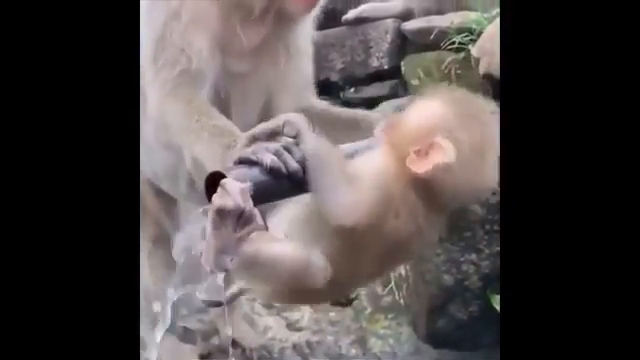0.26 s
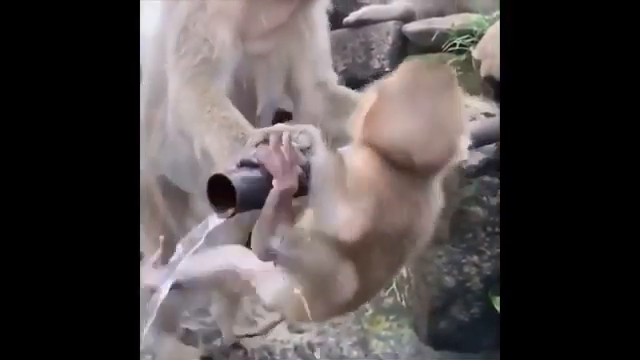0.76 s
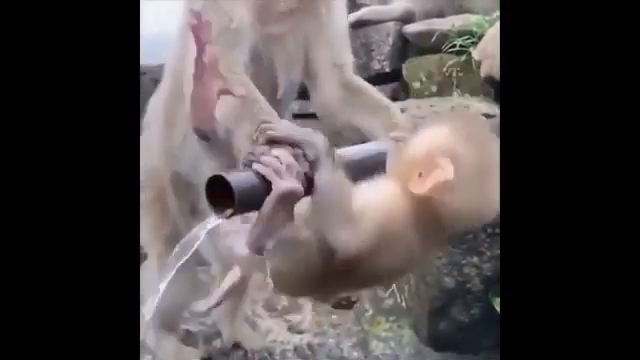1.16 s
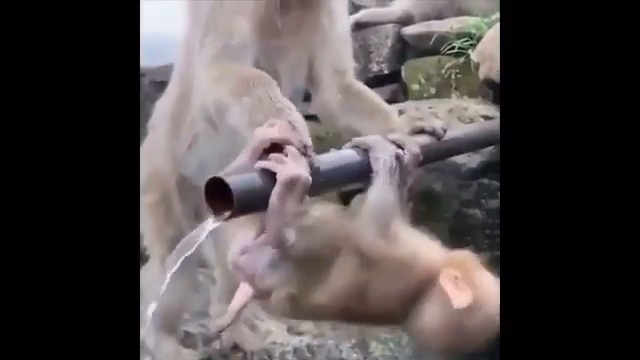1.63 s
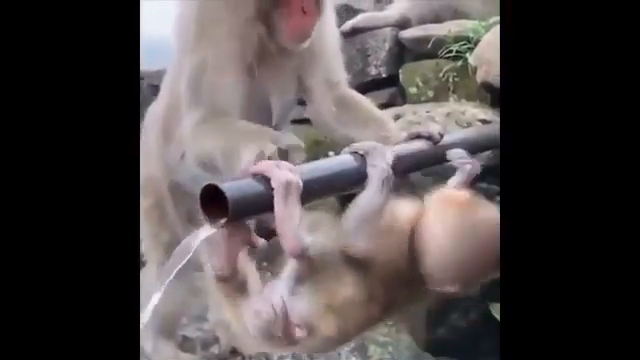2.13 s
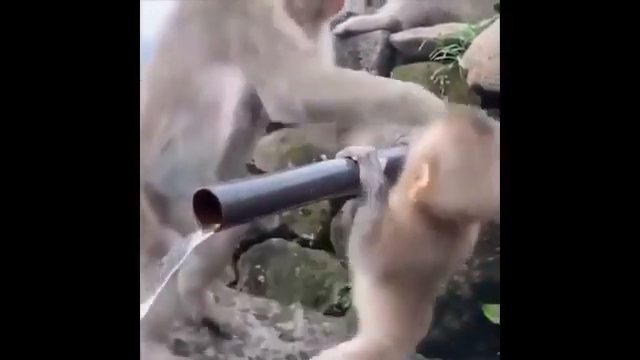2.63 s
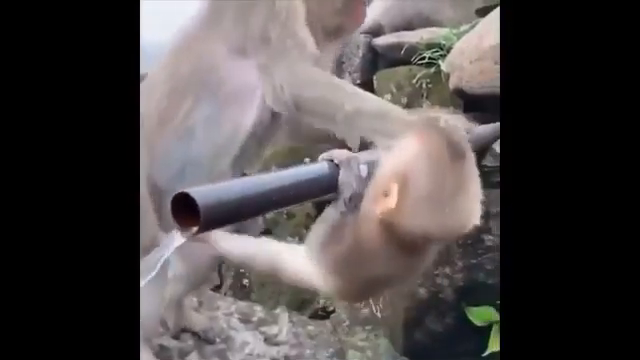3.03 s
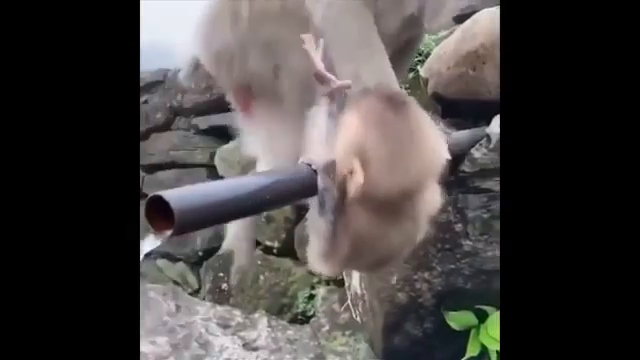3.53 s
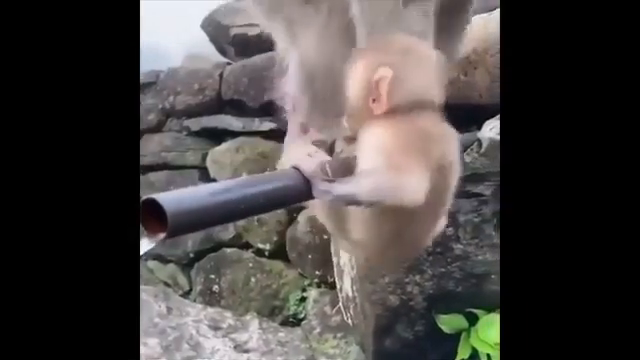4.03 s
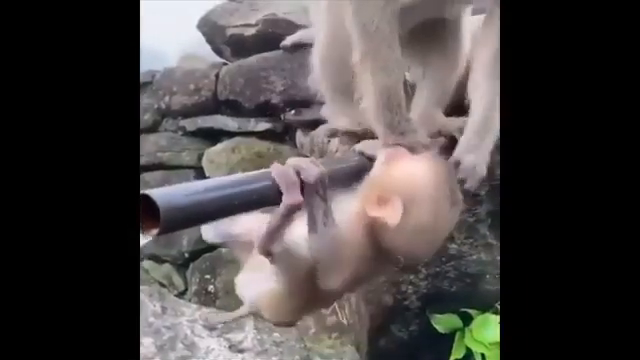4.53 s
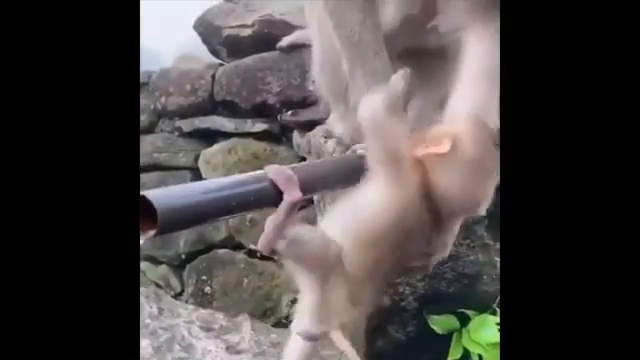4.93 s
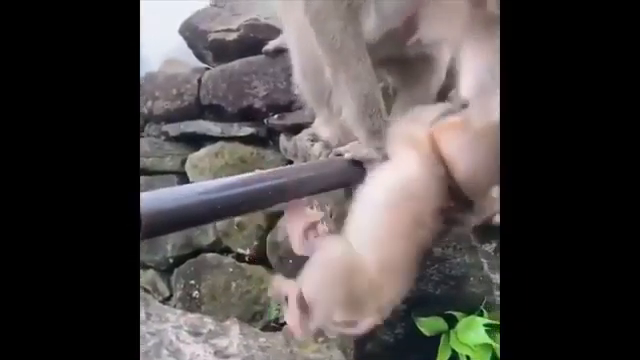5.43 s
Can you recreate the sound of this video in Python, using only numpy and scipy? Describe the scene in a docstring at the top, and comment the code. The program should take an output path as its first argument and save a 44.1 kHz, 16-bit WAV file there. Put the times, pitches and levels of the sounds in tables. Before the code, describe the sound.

A thin stream of water falls from a pipe and spatters on stone, heard closely outdoors through a small, slightly rough microphone. From 0 to 1.3 s the flow is disturbed: short rising bubble tones, hollow plops and wet slaps stir a churning, frothy puddle. Slaps gather from about 0.15 to 0.45 s, and the boldest gurgles come around 0.6 to 0.7 s, with more blips until about 1 s. Crisp drop bursts begin at about 0.1 s and continue throughout. After 1.3 s the gurgling is gone, leaving bright, dry-edged ticks and small splats at irregular spacing amid thin, clumped hissing spray that gently swells and thins. A short, soft low wind thump passes near 2.6 s. A fuller wet slap stands out at about 4.8 s. The patter runs on to the end at about 5.7 s, over a faint outdoor wash and light wind.

```python
"""A thin stream falls from a pipe and spatters on stone, outdoors, near a small microphone.
At first it is disturbed: trapped pockets gurgle as rising sines, slaps ring and puff in a churning puddle.
From the first moments drops burst on stone as filtered cracks and noise puffs, amid clumped hissing spray.
The gurgling and churning end after about 1.3 s; splats and spray go on, with a few late slaps.
Filtered noise makes a light wind, with one gust at 2.57 s, and a faint outdoor wash throughout."""
import sys
import numpy as np
from scipy import signal
from scipy.fft import rfft, irfft
from scipy.io import wavfile
from scipy.ndimage import uniform_filter1d

SR = 44100
rng = np.random.default_rng(int(sys.argv[2]) if len(sys.argv) > 2 else 0)


def inscribe(sig):
    """Save sig as 16-bit PCM at rate SR to the path in sys.argv[1].

    A 1-D sig is mono; a 2-D sig holds one channel per row.
    Samples are clipped to [-1, 1] before scaling.
    """
    pcm = np.round(np.clip(np.atleast_2d(sig).T, -1, 1) * 32767)
    wavfile.write(sys.argv[1], SR, pcm.astype(np.int16))


N = 250480

# wind and far wash, relative spectrum: (frequency [Hz], level [dB])
AIR_TONE = [(15, -37), (25, -22), (55, -1.5), (83, -11.5), (146, -8.5), (271, -4.5), (338, -13), (405, -9),
            (884, -17), (1850, -17.5), (2270, -18), (2710, -25), (3000, -31), (3900, -56), (6600, -120)]
# ringing air pockets: (start [s], length [s], start pitch [Hz], end pitch [Hz], start level [dB])
AIR_POCKETS = [ (.001, 0.023, 767, 930, -33.5), (.001, 0.053, 460, 700, -41),
               (0.027, 0.008, 1460, 1430, -37), (0.067, 0.036, 1133, 1040, -26.5),
               (0.171, 0.012, 840, 1340, -33.5), (0.174, 0.053, 743, 1300, -49),
               (.422, 0.0093, 850, 1000, -24.5), (0.424, 0.016, 992, 1250, -28),
               (0.473, 0.0045, 1020, 1170, -24), (0.49, 0.023, 820, 1510, -41),
               (0.562, 0.032, 990, 1430, -39.5), (0.593, 0.0079, 594, 1000, -12.5),
               (0.613, 0.051, 468, 1300, -31.5), (0.662, 0.015, 680, 1470, -30),
               (0.674, 0.039, 830, 900, -37), (0.691, 0.005, 730, 830, -8), (0.698, 0.013, 656, 1150, -26),
               (0.723, 0.046, 854, 810, -37), (.724, 0.013, 1503, 2600, -33),
               (0.732, 0.014, 1720, 2400, -35), (0.745, 0.058, 926, 966, -33.5),
               (0.778, 0.056, 1430, 1430, -37.5), (0.855, 0.025, 883, 1380, -32),
               (0.858, 0.0068, 1690, 2500, -36), (0.9, 0.015, 526, 1160, -30.5),
               (0.914, 0.0055, 1840, 3100, -25), (0.921, 0.0026, 595, 825, -23),
               (0.926, 0.0097, 1400, 2200, -51), (0.95, 0.038, 1190, 1140, -33),
               (0.953, 0.023, 776, 755, -30), (1.002, 0.063, 676, 950, -52.5),
               (1.287, 0.067, 1500, 1490, -54), (1.088, 0.11, 296, 810, -50.5), ]
# water slapping a puddle: (peak time [s], level [dB], pitch [Hz], width [s])
PUDDLE_SLAPS = [(0.0336, -37, 1475, 0.0073), (0.068, -33.5, 1430, 0.0015), (0.15, -46, 2070, 0.01),
                (0.16, -31, 2040, 0.0023), (0.1658, -22, 1760, 0.0016), (0.176, -45, 1620, 0.0067),
                (0.188, -39, 1800, 0.0022), (0.32, -45, 2880, 0.0055), (0.329, -41, 3700, 0.0091),
                (0.3378, -39.5, 2460, 0.0084), (0.345, -39, 2200, 0.0061), (0.369, -33, 1850, 0.0063),
                (0.38, -40, 2360, 0.0059), (0.3948, -38, 2390, 0.011), (0.41, -41, 2470, 0.012),
                (0.422, -26.5, 2100, 0.0038), (0.4493, -24, 3800, 0.00073), (0.4598, -28.5, 2940, 0.0034),
                (.487, -48, 1690, 0.0044), (0.5921, -25.5, 1850, 0.0021), (0.603, -30, 1680, 0.0015),
                (0.618, -37, 2400, 0.0065), (.635, -28, 1980, 0.00044), (.665, -28, 1340, 0.0022),
                (0.691, -30.5, 1320, 0.0091), (.6987, -27, 1750, 0.00083), (0.7077, -32.5, 2730, 0.0073),
                (0.7157, -32.5, 1740, 0.0023), (0.7258, -29, 1830, 0.0073), (0.853, -28.5, 1410, 0.0015),
                (.889, -39, 2050, 0.0025), (0.89, -30.5, 3600, 0.004), (0.9004, -31, 1480, 0.0016),
                (0.918, -26.5, 1720, 0.0025), (0.954, -33.5, 1410, 0.0024), (1.015, -43.5, 2600, .003),
                (1.025, -42.5, 2720, 0.0075), (1.068, -44, 1920, 0.0037), (1.635, -45.5, 1960, 0.0065),
                (2.539, -50, 2260, 0.0081), (4.844, -48, 1700, 0.0048), (4.8428, -44.5, 800, 0.00076),
                (4.8429, -28, 3410, 0.0054), (4.849, -37.5, 3040, 0.0069)]
# churning water, relative spectrum: (frequency [Hz], level [dB])
CHURN_TONE = [(250, -46), (600, -22), (1000, 1), (2200, 4), (3500, 1.5), (7000, -10), (12000, -70)]
# large drops bursting on stone:
# (touch time [s], relative body level [dB], body pitch [Hz], bright edge relative to body [dB])
STONE_SPLATS = [(0.1095, -29.5, 6760, -0.5), (.198, -32, 4270, -27), (.226, -29, 4300, -14),
                (0.2563, -24.5, 3600, 1.5), (.267, -30, 4000, -24), (.299, -30, 6500, -26),
                (0.3266, -29.5, 3660, -10), (0.3487, -19.5, 6200, -5), (0.367, -8.5, 2420, -21),
                (0.3995, -20, 4900, -31), (0.418, -15.5, 4470, -20), (0.4492, -16, 3660, -37),
                (.4575, -26, 3200, -20), (.5925, -35, 3600, 4), (.691, -29, 2970, -5),
                (0.6164, -30.5, 4040, 0), (0.7369, -29, 2500, 17.5), (0.8207, -15, 8850, -10),
                (0.853, -6, 5100, -19), (0.889, -22.5, 3430, -2), (0.9006, -19.5, 4470, -26),
                (0.9325, -26.5, 3530, 9.5), (0.9507, -22.5, 5630, -5), (1.067, -27.5, 4270, 4),
                (1.08, -36, 3720, 13), (1.1221, -18, 4640, -8), (1.1368, -46, 6020, 14),
                (1.1566, -24, 8000, 3), (1.1869, -34, 6570, 6), (1.3167, -31.5, 4310, 0),
                (1.3523, -17, 7760, -17), (1.4123, -40.5, 7390, 6), (1.4318, -45.5, 7100, 19.5),
                (1.4671, -45, 4400, 18), (1.482, -36, 7010, 8), (1.4972, -29, 7220, -3),
                (1.5588, -32.5, 7100, 6.5), (1.62, -34, 7380, 9), (1.6418, -35, 6890, -1),
                (1.6642, -23.5, 4520, -7), (1.6787, -23.5, 7800, -5), (1.7513, -41.5, 8170, 21.5),
                (1.8257, -39, 6980, 18), (1.839, -25.5, 7490, -7), (1.8544, -20, 5900, -27),
                (1.8715, -14.5, 7200, -12), (1.9242, -33.5, 6880, 0), (1.9681, -29, 5430, -5),
                (2.0509, -29, 7600, -3), (2.068, -22.5, 8140, -2), (2.1018, -31.5, 5960, 0),
                (2.118, -30, 6500, -6), (2.1272, -31, 7380, -3), (2.1467, -23.5, 4870, -10),
                (2.168, -29, 7000, -4), (2.1864, -13, 5600, -18), (2.2115, -33, 7430, 0),
                (2.2562, -15.5, 7540, -21), (2.2912, -30.5, 7010, -5), (2.318, -28.5, 5860, 5),
                (2.372, -25.5, 7000, 1), (2.406, -26, 5800, -6), (2.4135, -16, 5200, -10),
                (2.4363, -20, 7840, -13), (2.4565, -23.5, 8090, -7), (2.5106, -31, 7190, 4),
                (2.518, -34, 6300, -8), (2.584, -27.5, 7590, -10.5), (2.6041, -34, 7450, 3),
                (2.6428, -21, 7600, -6.5), (2.6789, -27.5, 6530, 16), (2.689, -44, 6500, -1),
                (2.7024, -21.5, 4930, -13), (2.7254, -22, 7200, -26), (2.8035, -36, 7500, 16),
                (2.812, -33, 7500, 1), (2.8494, -22, 5740, -8), (2.8726, -18, 4280, -24),
                (2.9359, -28, 7320, -4), (2.9547, -25, 7020, 11), (2.9857, -26.5, 7410, 3.5),
                (2.993, -35, 7000, -4), (3.001, -32, 7000, -16), (3.0076, -22, 8100, -5),
                (3.0446, -18, 4470, -11), (3.049, -28, 5170, 1), (3.1, -39, 6140, 6),
                (3.1205, -33, 7000, 11.5), (3.1589, -30.5, 6500, -5), (3.2217, -34, 7580, 2),
                (3.3301, -21, 7300, -5), (3.3457, -44, 6310, 23), (3.361, -22.5, 6350, -2),
                (3.3735, -37, 6450, -23), (3.397, -18.5, 6400, -2), (3.4511, -25, 7400, -2),
                (3.5124, -23.5, 4600, -8), (3.5505, -32, 7050, -8), (3.5687, -10.5, 7600, -25),
                (3.6107, -26, 7910, -6), (3.6304, -24.5, 7420, -8), (3.6364, -37, 7470, 2),
                (3.6782, -33.5, 4360, -17), (3.6942, -26.5, 5570, -20), (3.7524, -44.5, 8040, 18),
                (3.8294, -32.5, 7120, -14), (3.8425, -28.5, 7200, 10), (3.8473, -33, 7200, 10),
                (3.9366, -23.5, 7950, -30), (3.9626, -31.5, 7550, 1), (4.1302, -30, 7680, 0),
                (4.1455, -18.5, 8440, -11), (4.1936, -23, 4230, -10.5), (4.2274, -31, 7850, 8),
                (4.2431, -20, 4800, -27), (4.2718, -26, 7320, -11), (4.3282, -34.5, 7200, 0),
                (4.3357, -40, 7600, 3), (4.377, -28, 6450, -11), (4.3962, -16, 7100, -34),
                (4.4335, -30, 7190, -3), (4.5093, -23.5, 5500, -12), (4.5717, -30.5, 7910, 1),
                (4.5846, -29.5, 6900, -11), (4.6198, -18.5, 8440, -6), (4.6405, -38, 7410, 11),
                (4.664, -32, 7580, 3), (4.732, -28, 7060, 1), (4.7381, -18.5, 4230, 9.5),
                (4.772, -21, 6500, -11), (4.798, -27, 8130, -1), (4.809, -31, 7500, 0),
                (4.8412, -14.5, 3560, -9.5), (4.8791, -35, 6870, 13.5), (4.9214, -28.5, 5150, -1),
                (4.9362, -27.5, 7460, 12), (4.9543, -30.5, 4960, 1), (4.9971, -36, 7550, 21.5),
                (5.005, -25, 7960, -4), (5.0385, -25.5, 6840, 0), (5.0509, -27, 7230, -2),
                (5.0768, -26.5, 7700, -4), (5.0974, -42.5, 7560, 18.5), (5.1378, -43, 4400, 19),
                (5.1474, -27.5, 8200, 4), (5.2107, -18.5, 5740, -21), (5.217, -22, 7160, -29),
                (5.3177, -31, 7180, 2), (5.3427, -22, 8030, -8.5), (5.3971, -32, 7550, 8.5),
                (5.523, -31.5, 7100, -6.5), (5.5781, -21, 7460, -6), (5.6143, -25.5, 8400, -3),
                (5.6634, -16, 8200, -15)]
# fine spray, relative level: (time [s], level [dB])
SPRAY_LEVEL = [(0.0, -52.5), (0.14, -52), (0.3, -54.5), (0.4, -57), (0.7, -49), (0.81, -59), (1.03, -50),
               (1.27, -57), (1.75, -55), (1.88, -59), (2.1, -55.5), (2.28, -54.5), (2.45, -56.5),
               (2.85, -52), (3.15, -55), (3.75, -53), (3.95, -52.5), (4.14, -53.5), (4.33, -53.5),
               (4.57, -59), (4.81, -56), (4.93, -61), (5.2, -55), (5.35, -53.5), (5.68, -60.5)]
# splats and spray, relative spectrum: (frequency [Hz], level [dB])
SPRAY_TONE = [(1500, -52), (2800, -20.5), (3800, -9.5), (6000, -3), (7700, 3.5), (9100, 5.5), (10500, 24.5),
              (12000, 27), (13400, 4), (14000, -27), (15500, -66)]

# wind on the microphone, with one gust
AIR_DB, WIND_DB = -59, -61.5
GUST_S, GUST_DB, GUST_WIDTH_S = 2.57, -45.5, 0.057
# a pocket fades less the further its pitch climbs; a long-lived one climbs late
FADE_DB, FADE_DB_PER_OCTAVE, LATE_CLIMB_PER_S = 26.5, -19, 13
# each slap before PUDDLE_ENDS_S leaves the puddle churning
STIR_DB, STIR_RISE_S, STIR_T60_S = -16.5, 0.003, 0.27
PUDDLE_ENDS_S, RAGGED_RAD = 1.3, 1.1
# lesser drops at random moments
SMALL_DROPS, SMALL_DB, SMALL_SPREAD_DB, SMALL_EDGE_DB = 45, -47, 1.8, (-15.5, 8)
# from touch to mean peak; the pitch ranges of a drop peak apart by random lags
PEAK_AFTER_S, STAGGER_S = 0.0015, 0.0008
# the body weakens away from its pitch
OFF_PITCH_DB_PER_OCTAVE, CREST_DB = -25, -1.5
# bright-edged drops are brief
WIDTH_S, BRIEF_EDGE_DB, LONG_EDGE_DB = (0.0005, 0.0036), 13, -13
FIZZ_SHARE = 0.25  # tiny bubbles in the spray
TICK_COLOUR_DB, SPRAY_COLOUR_DB, CHURN_COLOUR_DB = 4.0, 4.0, 6  # rms depth of mottling
CEILING, EDGE_HZ = 0.24, 14950  # input saturation, band limit


def gain_of(db):
    """Converts dB to amplitude."""
    return 10 ** (np.asarray(db) / 20)


def evened(x):
    """Scales x to unit rms."""
    return x / np.sqrt(np.mean(x ** 2) + 1e-20)


def curve(rows):
    """Reads a level curve at every sample."""
    s, db = np.transpose(rows)
    return gain_of(np.interp(np.arange(N) / SR, s, db))


def colour(x, points):
    """Shapes the spectrum of x by (Hz, dB) points."""
    f, db = np.transpose(points)
    hz = np.fft.rfftfreq(N, 1 / SR)
    gain = gain_of(np.interp(np.log(hz + 1), np.log(f + 1), db))
    return irfft(rfft(x) * gain, N)


def band(x, lo_hz, hi_hz):
    """Band-passes x."""
    return signal.sosfilt(signal.butter(3, [lo_hz, hi_hz], "band", fs=SR, output="sos"), x)


def add(mix, s, sound):
    """Adds a sound at s seconds, trimmed to the mix."""
    sound = sound[max(-round(s * SR), 0):]
    part = mix[max(round(s * SR), 0):][:len(sound)]
    part += sound[:len(part)]


def mottle(x, db, bins, frames):
    """Random louder and softer patches in time and pitch."""
    z = signal.stft(x, nperseg=128, noverlap=96)[2]
    patches = rng.standard_normal(z.shape[::-1]).T
    for _ in range(2):
        patches = uniform_filter1d(uniform_filter1d(patches, int(bins), 0), int(frames), 1)
    gain = gain_of(db * evened(patches))
    return signal.istft(z * evened(gain), nperseg=128, noverlap=96)[1][:N]


def burst(width_s, skirt_db, before_s, after_s):
    """Envelope, peak in the middle: a sharp core on a weaker skirt that swells before it and fades after."""
    t = np.arange(-800, 800) / SR
    core = np.exp(-(2 * t / max(width_s, .0005)) ** 2)
    skirt = np.exp(-np.where(t < 0, -t / before_s, t / after_s))
    taper = np.cos(np.pi / 2 * t / t[0])
    return core + gain_of(skirt_db) * skirt * taper


def random_hits(per_s, spread_db):
    """Impulses at random moments, a few much larger than the rest."""
    size = gain_of(spread_db * np.minimum(rng.exponential(1, N), 3))
    return size * (rng.random(N) < per_s / SR)


def patter(per_s, spread_db, width_s):
    """Envelope of many random droplets, each a short burst."""
    hits = random_hits(per_s, spread_db)
    return evened(signal.oaconvolve(hits, burst(width_s, -57, 0.00045, 0.0022), "same"))


def froth(per_s, lo_hz, hi_hz, count=24):
    """Swarm of tiny bubbles: short rising rings of many sizes at random moments."""
    out, t = np.zeros(N), np.arange(1200) / SR
    for hz in np.geomspace(lo_hz, hi_hz, count):
        fade = np.exp(-t * hz / 7) * np.minimum(t / 0.00034, 1)
        ring = np.sin(2 * np.pi * hz * t * (1 + 14 * t)) * fade
        births = random_hits(per_s / count, 4.0)
        out += signal.oaconvolve(births, ring)[:N]
    return evened(out)


def air():
    """Far wash, uneven above the bass; wind buffets the bass."""
    tone = [(10, -38)] + list(AIR_TONE) + [(6000, -65)]
    wash = evened(colour(rng.standard_normal(N), tone))
    buffet = gain_of(2.02 * evened(band(rng.standard_normal(N), 1.1, 30.0)))
    wind = evened(band(rng.standard_normal(N), 45.6, 98.0))
    gust = gain_of(GUST_DB) * np.exp(-((np.arange(N) / SR - GUST_S) / GUST_WIDTH_S) ** 2)
    far = buffet * band(wash, 50, 473) + mottle(band(wash, 402, 3300), 3.05, 2, 18.5)
    return gain_of(AIR_DB) * far + (gain_of(WIND_DB) + gust) * buffet * wind


def bubbles():
    """Each pocket is a sine whose pitch shifts, mostly up, as it nears the surface; its wall shakes."""
    out = np.zeros(N)
    noise = rng.standard_normal((2, N))
    shake = evened(uniform_filter1d(uniform_filter1d(noise, 120), 120))
    for s, length_s, start_hz, end_hz, db in AIR_POCKETS:
        climb = end_hz / start_hz
        bend = 1 + (LATE_CLIMB_PER_S * length_s) ** 2
        fade_db = FADE_DB + FADE_DB_PER_OCTAVE * np.log2(climb)
        u = np.linspace(0, 1, round(length_s * SR))
        pitch_shake, level_shake = shake[:, round(s * SR):][:, :len(u)]
        hz = start_hz * climb ** (u ** bend) * (1 + .035 * pitch_shake)
        ramps = np.minimum(u * length_s / 0.0014, 1) * np.minimum((1 - u) / 0.1, 1)
        level = gain_of(db - fade_db * u + 2.84 * level_shake)
        add(out, s, level * ramps * np.sin(2 * np.pi * np.cumsum(hz) / SR))
    return out


def stir():
    """Level of the churning: it swells after every early slap and settles again."""
    kicks, t = np.zeros(N), np.arange(SR // 2) / SR
    for s, db, _, width_s in PUDDLE_SLAPS:
        power = gain_of(db + STIR_DB) ** 2 * width_s / 0.0084
        kicks[round(s * SR)] = (s < PUDDLE_ENDS_S) * power
    settle = (1 - np.exp(-t / STIR_RISE_S)) * gain_of(-60 * t / STIR_T60_S)
    return np.sqrt(abs(signal.oaconvolve(kicks, settle ** 2)[:N]))


def puddle():
    """Each slap is a brief ragged ring inside a puff of noise; early on the water churns and froths."""
    out, t = np.zeros(N), np.arange(-800, 800) / SR
    puffs = rng.standard_normal((len(PUDDLE_SLAPS), 1600))
    for (s, db, hz, width_s), puff in zip(PUDDLE_SLAPS, puffs):
        ragged = RAGGED_RAD * evened(uniform_filter1d(puff, size=60))
        ring = np.sin(2 * np.pi * hz * t * (1 + 8 * t) + ragged)
        ring *= burst(width_s, -56, 0.0021, 0.0032)
        splash = 0.2 * evened(band(puff, hz * 0.48, hz * 1.41))
        splash *= burst(width_s, -5.0, 0.0068, 0.071)
        add(out, s + t[0], gain_of(db) * (ring + splash))
    churn = (0.18 + patter(400, 4.0, 0.006)) * rng.standard_normal(N)
    churn = evened(mottle(colour(churn, CHURN_TONE), CHURN_COLOUR_DB, 2, 12))
    return out + stir() * (churn + 0.26 * froth(2800, 603, 5500))


def drops():
    """The large drops and a random scatter of lesser ones, all in the same columns."""
    s, size, pitch, edge = rng.random((SMALL_DROPS, 4)).T
    edge_db = np.interp(edge, [0, 1], SMALL_EDGE_DB)
    body_db = SMALL_DB - SMALL_SPREAD_DB * np.log(1 - .95 * size) - 1.2 * edge_db
    small = [s * (N / SR - .01), body_db, 3500 * 2.2 ** pitch, edge_db]
    return list(STONE_SPLATS) + list(np.transpose(small))


def stone():
    """Each splat is a crack inside a puff, in three ranges of pitch; spray comes in clumps between."""
    ranges_hz = [(2300, 5000), (5500, 8090), (9200, 13800)]
    shapes, cracks = np.zeros((2, 3, N))
    rows = drops()
    tosses = rng.random((len(rows), 4))
    lags_s = rng.uniform(-STAGGER_S, STAGGER_S, (len(rows), 3))
    for (s, body_db, hz, edge_db), (*toss, size), lags in zip(rows, tosses, lags_s):
        dull = np.clip((BRIEF_EDGE_DB - edge_db) / (BRIEF_EDGE_DB - LONG_EDGE_DB), 0, 1)
        width_s = np.interp(.35 * size + .65 * dull, [0, 1], WIDTH_S)
        sign = np.sign(np.array(toss) - .5)
        octaves_off = abs(np.log2(np.mean(ranges_hz, axis=1) / hz))
        part_db = body_db + OFF_PITCH_DB_PER_OCTAVE * octaves_off
        part_db[-1] = body_db + edge_db + CREST_DB  # the bright edge
        peaks_s = s + PEAK_AFTER_S + lags
        at = np.minimum(np.round(peaks_s * SR).astype(int), N - 1)
        cracks[range(3), at] = sign * gain_of(part_db) * 0.00052 / width_s  # brief drops crack hardest
        shape = burst(width_s, -11.0, 0.002, 0.003)
        for row, db, peak_s in zip(shapes, part_db, peaks_s):
            add(row, peak_s - len(shape) / 2 / SR, gain_of(db) * shape)
    clumps = .5 + patter(140, 3.2, 0.007)
    beads = patter(150, 6.5, 0.0013)
    puffs, ticks, spray = np.zeros((3, N))
    for shape, crack, (lo_hz, hi_hz), share in zip(shapes, cracks, ranges_hz, (.4, .4, .6)):
        hiss = band(colour(rng.standard_normal(N), SPRAY_TONE), lo_hz, hi_hz)
        size = np.std(hiss)
        steady = hiss / np.sqrt(uniform_filter1d(hiss ** 2, 40) + 1e-12)
        puffs += steady * shape
        ticks += band(colour(crack, SPRAY_TONE), lo_hz, hi_hz) / size
        grains = clumps + 0.21 * beads + 0.05 * patter(160, 6.0, 0.001)
        spray += hiss / size * share * grains
    spray += FIZZ_SHARE * froth(500, 3160, 9800)
    splats = mottle(0.36 * puffs + 0.5 * ticks, TICK_COLOUR_DB, 2.7, 3)
    return splats + curve(SPRAY_LEVEL) * mottle(spray, SPRAY_COLOUR_DB, 4, 8)


def scene():
    """Sums all layers into one channel."""
    return (air() + bubbles() + puddle() + stone())[None]


def record(dry):
    """The input rounds off the sharpest peaks; then the band limit."""
    rounded = CEILING * np.tanh(dry / CEILING)
    lowpass = signal.firwin(101, EDGE_HZ, window=("kaiser", 9), fs=SR)
    return signal.oaconvolve(rounded, lowpass[None], "same")


dry = scene()
out = record(dry)
inscribe(out)
```